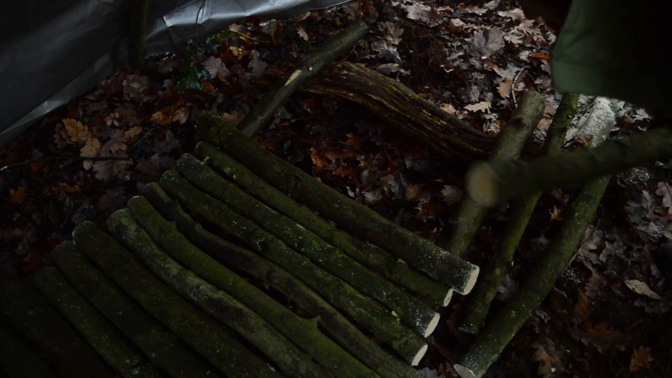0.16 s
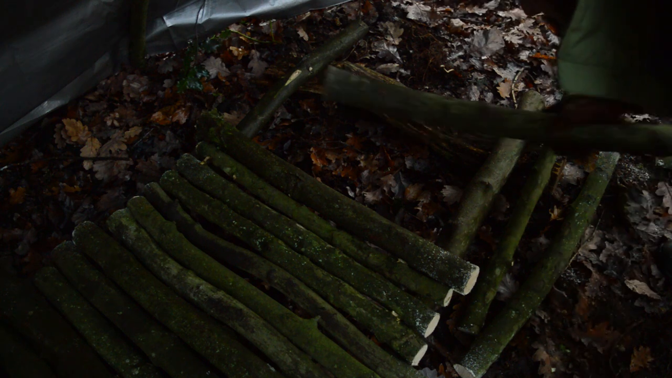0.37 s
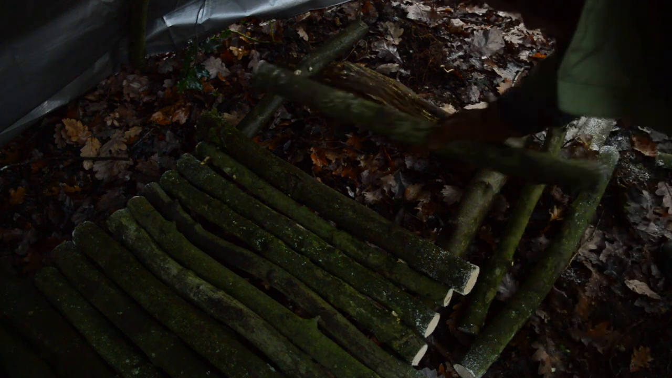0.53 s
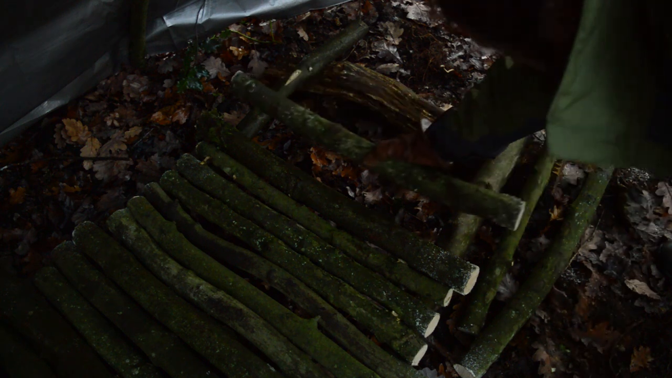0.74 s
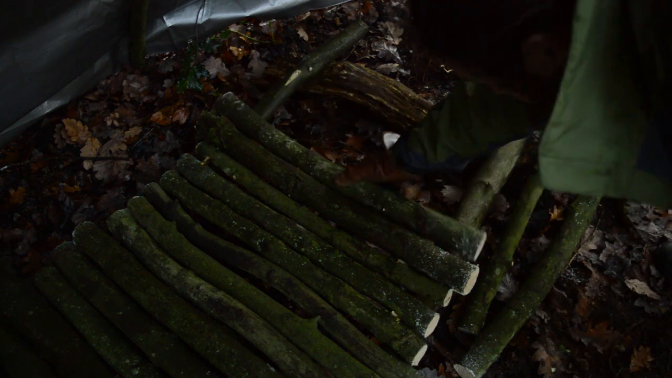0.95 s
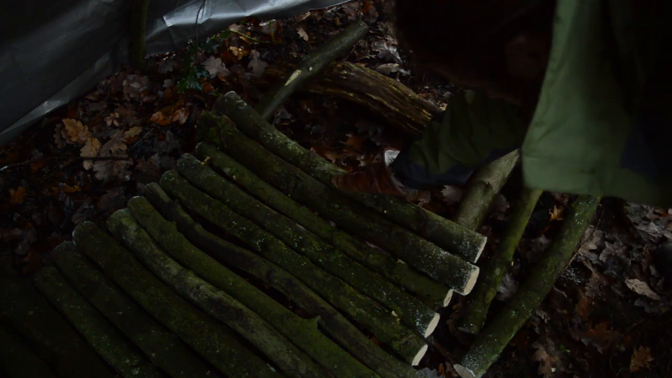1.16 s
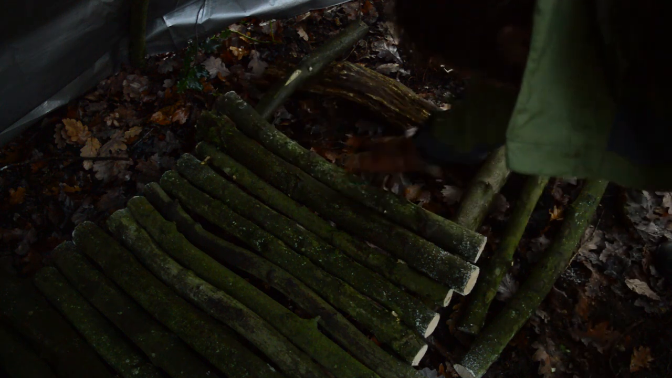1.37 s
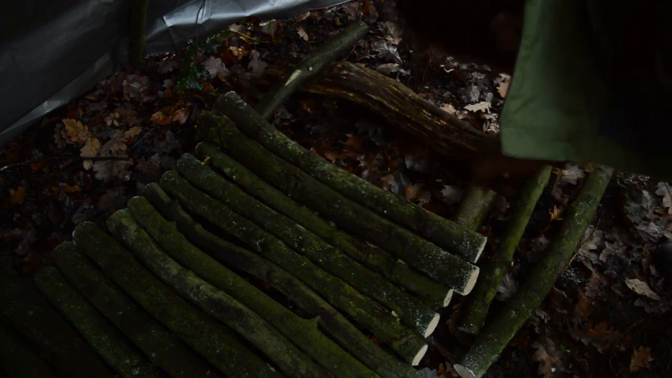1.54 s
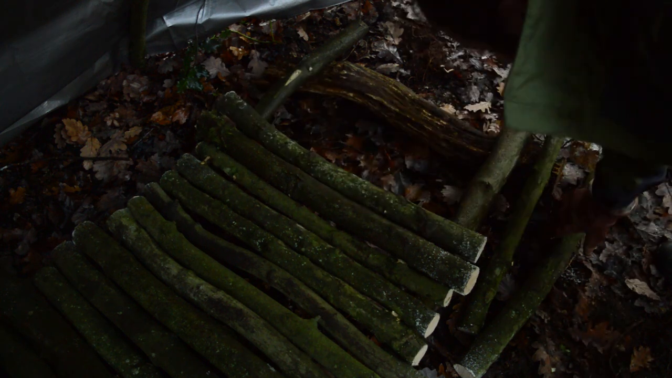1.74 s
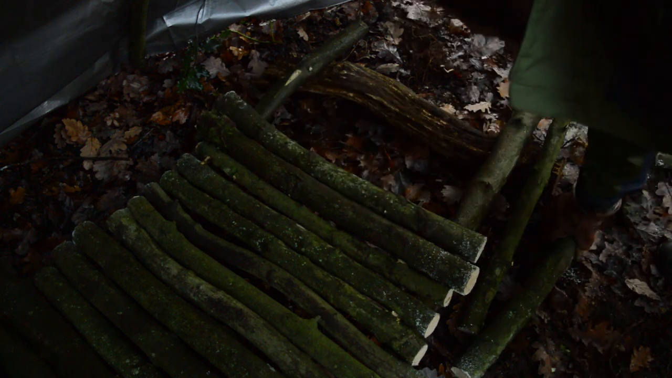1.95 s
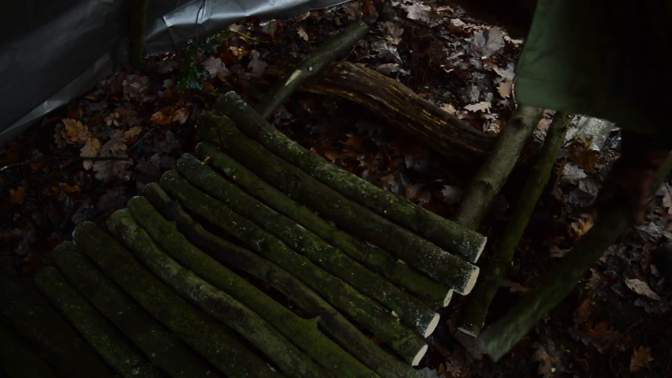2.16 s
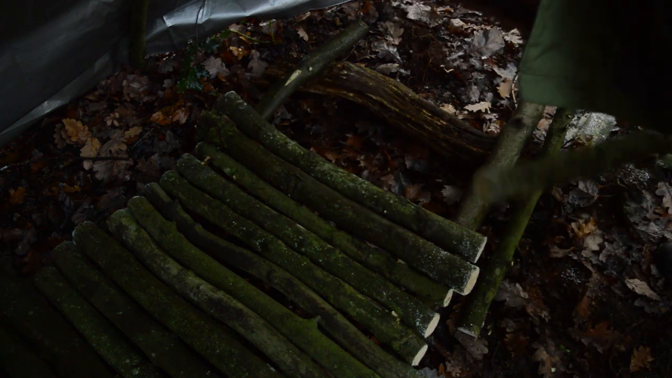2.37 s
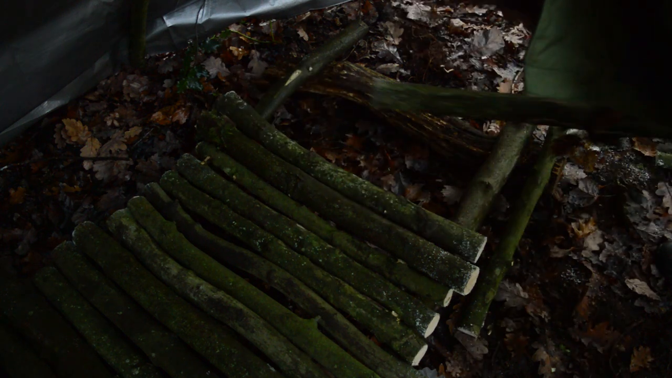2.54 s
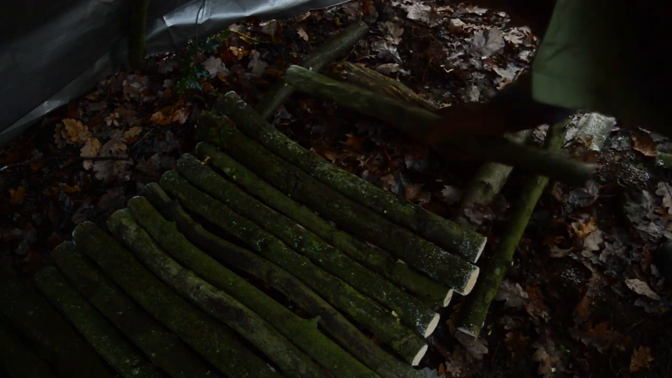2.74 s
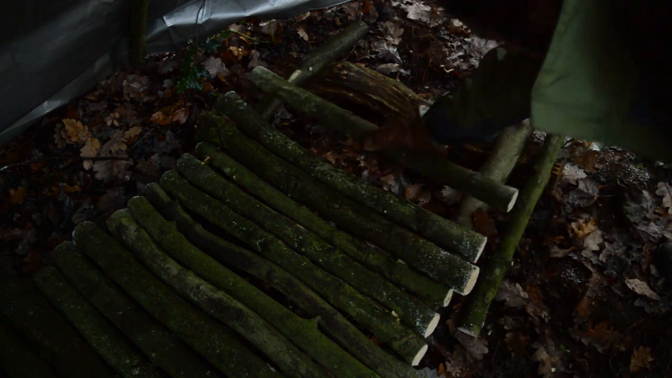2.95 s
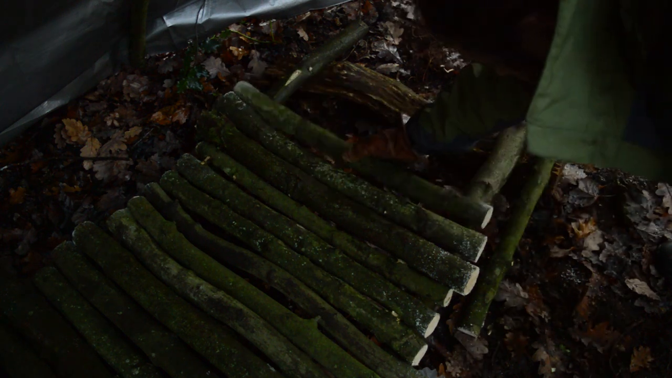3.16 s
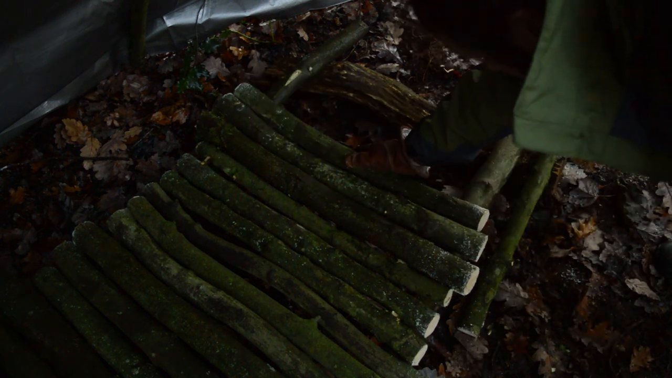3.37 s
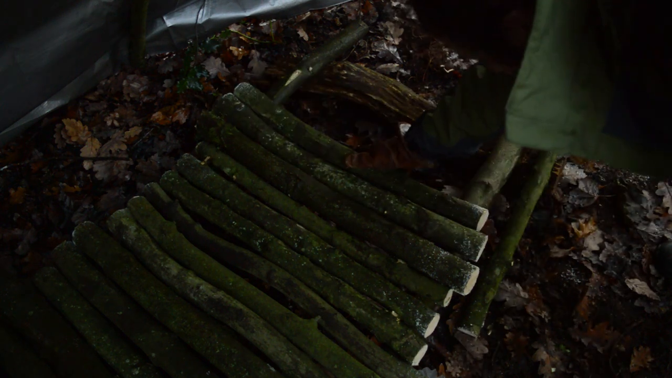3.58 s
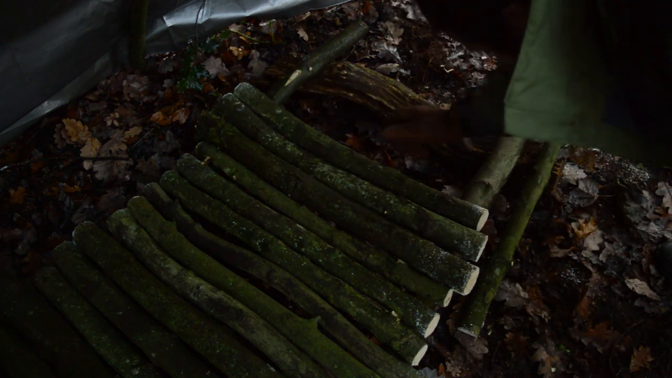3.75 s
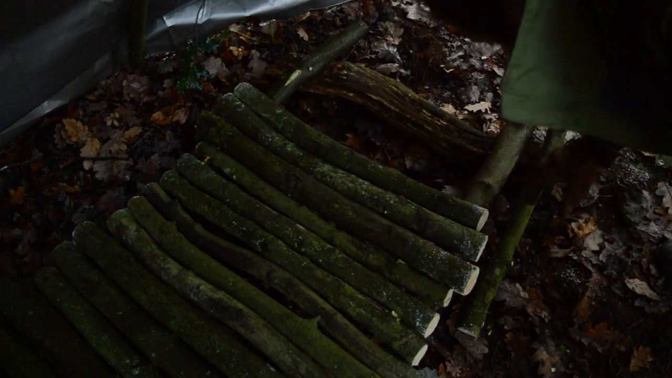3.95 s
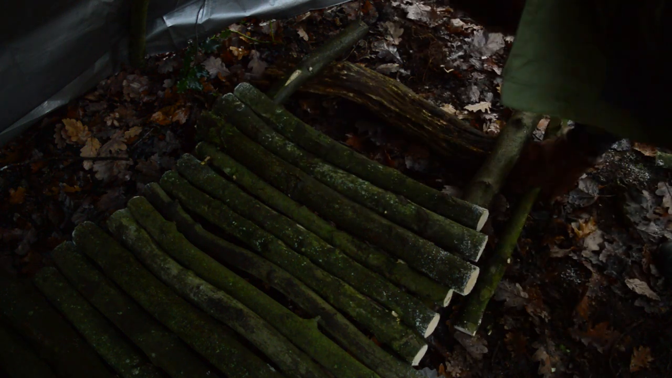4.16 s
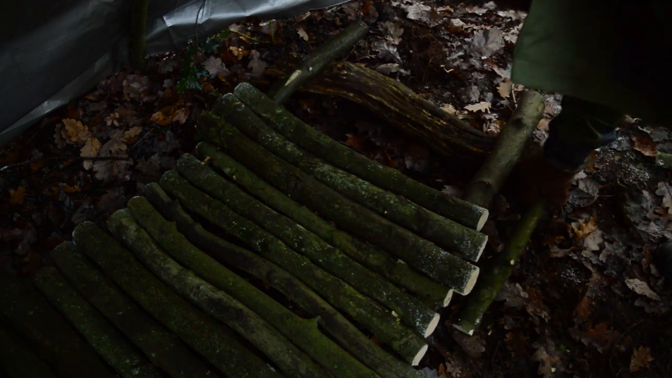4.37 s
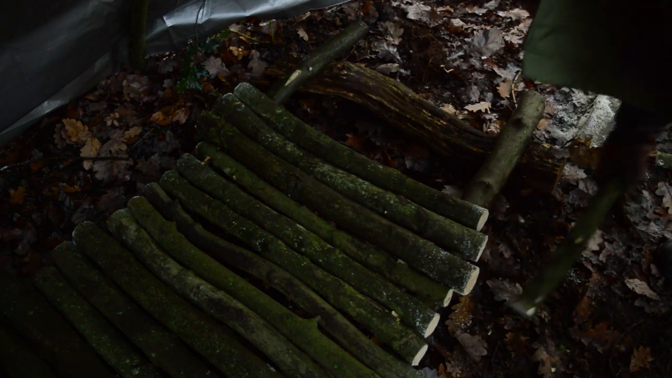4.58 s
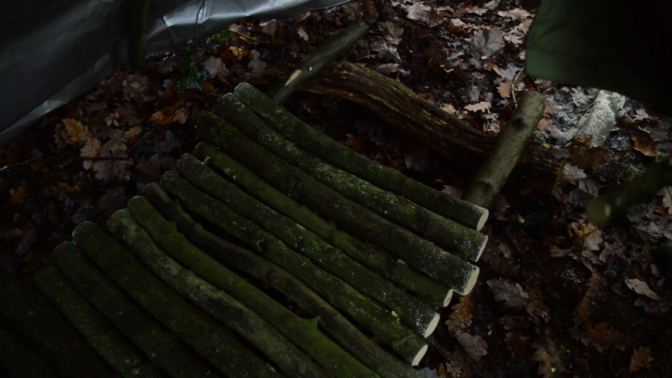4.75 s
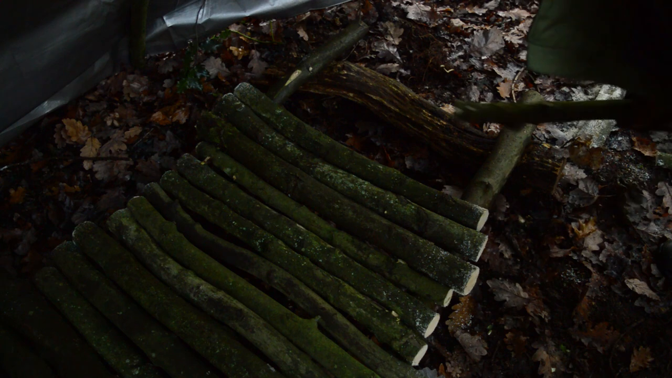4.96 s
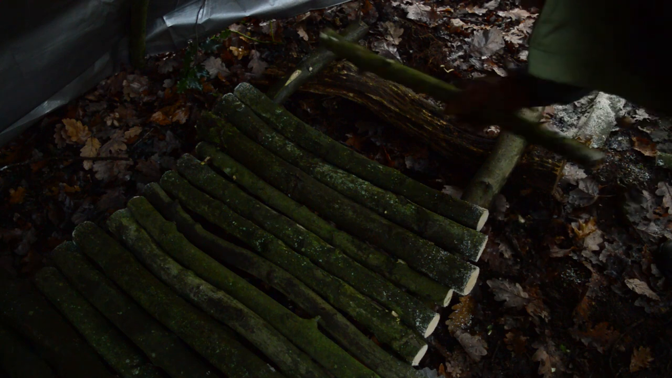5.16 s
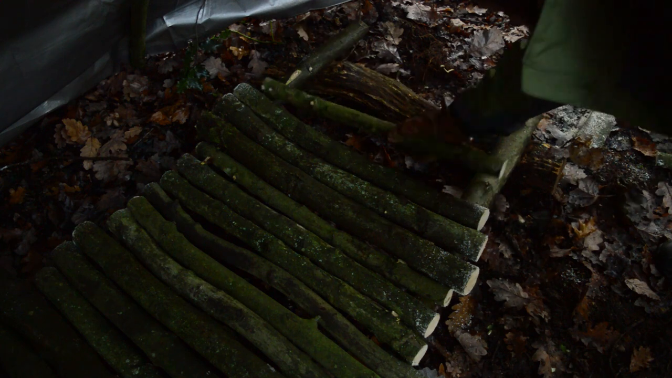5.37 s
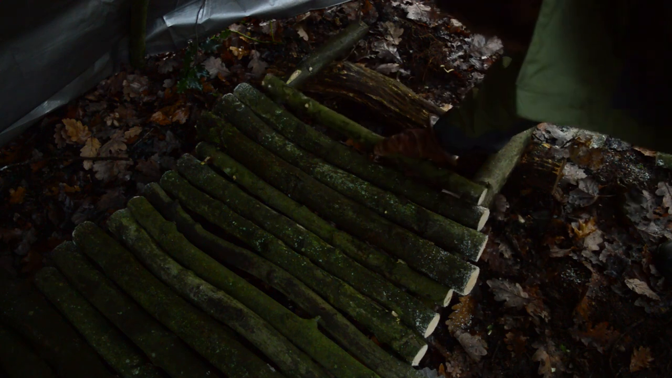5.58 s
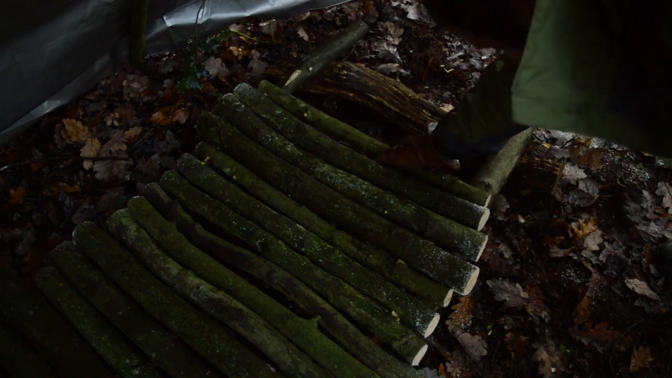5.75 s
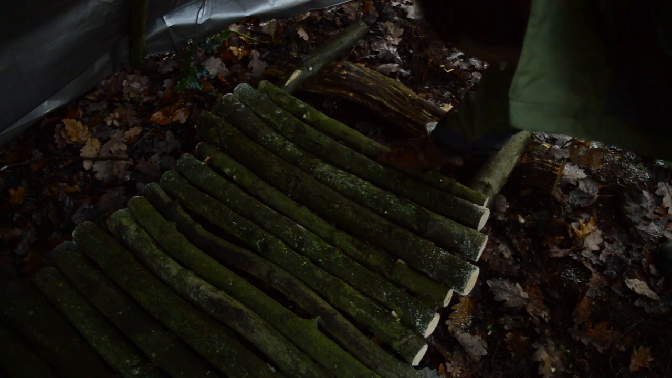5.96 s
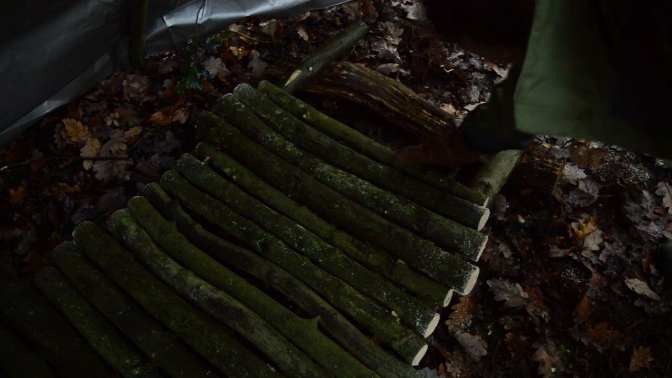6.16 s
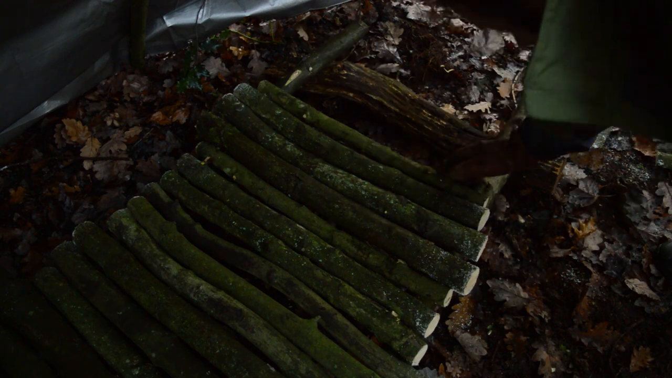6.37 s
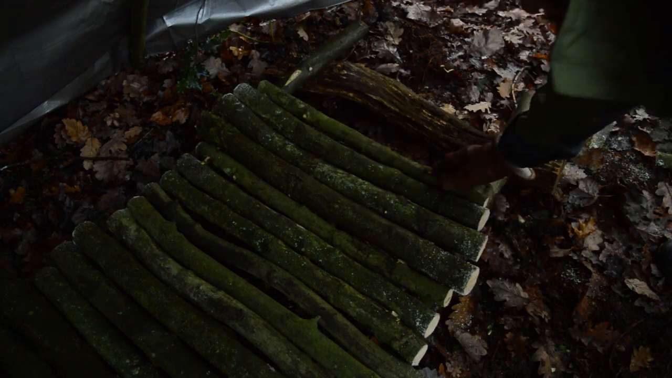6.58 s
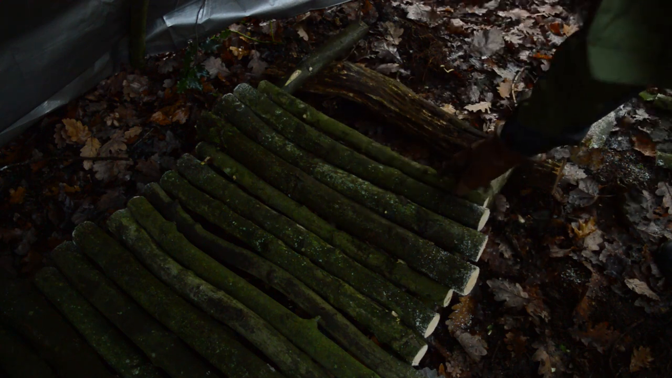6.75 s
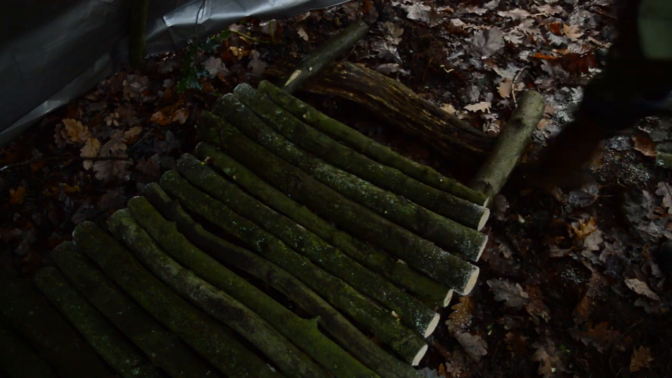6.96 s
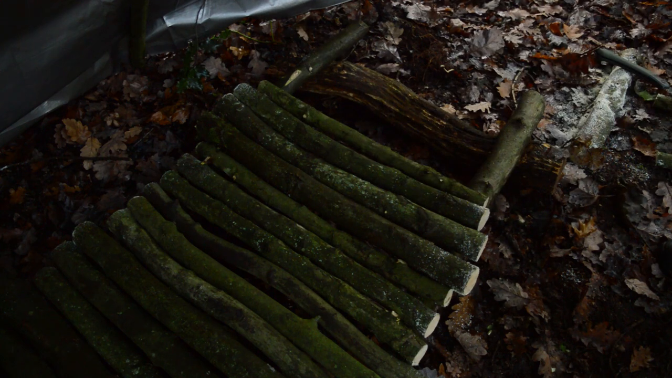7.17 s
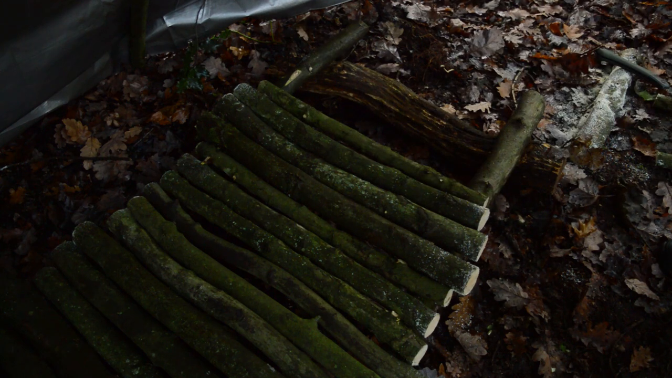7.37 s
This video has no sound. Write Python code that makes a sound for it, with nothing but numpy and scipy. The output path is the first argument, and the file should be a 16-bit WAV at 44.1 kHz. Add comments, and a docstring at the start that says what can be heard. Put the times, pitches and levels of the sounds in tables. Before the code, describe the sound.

Dull, dry wooden knocks at long intervals as poles are set down in woodland, with bark scuffs, twig taps and a soft distant roar.

```python
"""A steady far roar of wind and road, smooth noise with little treble, lies under everything from the start.
Over it three green wooden poles are laid one after another on a log frame in a wood, close to the microphone.
Each pole touches, drops and bounces; every blow adds up dying sine tones, one for each way the pole bends.
Bark scuffs, drags and rustling leaves and sleeves are shaped noise; twig taps are short notes with a puff;
faint chirps are wavering tones. All but rustle and roar get a short, dull echo from trees and ground."""
import sys
import numpy as np
from scipy import signal
from scipy.fft import rfft, irfft, next_fast_len
from scipy.io import wavfile
from scipy.ndimage import uniform_filter1d, map_coordinates

SR = 44100
rng = np.random.default_rng(int(sys.argv[2]) if len(sys.argv) > 2 else 0)


def wav_record(signal):
    """Record a signal, one row per channel, as 16-bit PCM in the file named by sys.argv[1]."""
    frames = np.transpose(np.atleast_2d(signal))
    bounded = np.clip(frames, -1, 1)
    # unit amplitude maps onto the largest positive 16-bit level
    quanta = np.round(bounded * 32767).astype(np.int16)
    wavfile.write(sys.argv[1], SR, quanta)


def invert_db(x):
    """Field ratio 10**(x/20) for x, a level in decibels (scalar or array-like)."""
    u = np.asarray(x, float) / 20
    return 10 ** u


N = 327222  # length in samples

# blows on the poles: t/s, level/dB, first bends over second/dB, third over second/dB,
# higher over second/dB, direction around the pole/degrees
BLOWS = [(1.000, -34, -6, -9, 3, 61), (1.012, -26.5, 11, -4, 2, 55), (1.020, -16, 3.5, -7, -11.5, 29),
         (1.0404, -6.5, -9.5, -11.5, -11.5, 45.5), (1.047, -23.5, 9, 0, -26, 50),
         (3.208, -25, 3.5, -6.5, -7.5, 55), (3.2414, -11, -5.5, -8, -22, 41),
         (3.248, -24.5, 3, -5, -22, 50), (5.337, -18, 3, -7, -26, 62), (5.4209, -36, -24, -14, 6.5, 47),
         (5.4225, -23.5, -2.5, -10, -18, 58), (5.456, -44.5, 11, -5, -9, 29),
         (5.554, -35.5, -1, -11, -22.5, 69), (5.627, -23.5, 2.5, -3, -19, 23),
         (5.684, -43.5, 14, -5, -10, 55), (5.693, -37, -4, -6, -15, 65), (5.8246, -16, -8, -8.5, -26, 57.5)]
# ringing tones of each pole with the frame under it: f/Hz, level/dB, time to die by 60 dB/s
POLE_MODES = [
    [(119, -3, 0.1), (189.5, 0, 0.075), (217, 5, 0.068), (256.5, 0.5, 0.12), (292, -7.5, 0.098),
     (566, 10, 0.033), (648, 2.5, 0.065), (685.5, -6, 0.2), (774, 6.5, 0.024), (980, 1.5, 0.061),
     (1152, -7.5, 0.11), (1370, -12.5, 0.081), (1796, -1, 0.042), (2355, -2.5, 0.03), (2510, -8, 0.044)],
    [(219, 9.5, 0.093), (282, 4.5, 0.11), (304, -11, 0.12), (382, 7.5, 0.038), (453, 2, 0.044),
     (607.5, 0, 0.15), (672, -2.5, 0.18), (901, -2.5, 0.086), (987, 7, 0.048), (1165, -5, 0.17),
     (1227, -2.5, 0.092), (1450, -5, 0.081), (1863, -2, 0.095), (2400, -9, 0.061), (3170, -11, 0.066),
     (3800, -13, 0.056)],
    [(204, 6.5, 0.061), (245.5, -5, 0.17), (394, 0.5, 0.048), (611, -1, 0.1), (834, -3, 0.043),
     (649, -0.5, 0.077), (1020, 1, 0.043), (1210, 3, 0.047), (1133, 5.5, 0.095), (1450, -1, 0.025),
     (1800, -2.5, 0.067), (2430, 10, 0.025), (3840, -1, 0.028), (4600, 1, 0.036)],
]
# moments after which the second and third pole are in hand: t/s
NEXT_POLE_TIMES = [2, 4.5]
# borders between first, second, third and higher bends: f/Hz
BEND_BORDERS = [350, 900, 1500]
# bark and dry leaves cracking: t/s, level/dB, dull part over bright/dB
BARK_CRACKS = [(0.996, -38, 1), (1.0122, -31, 4.5), (1.039, -16.5, 8), (1.058, -26, -25), (1.159, -44, -1),
               (1.975, -49, 2), (2.0717, -49, 7), (2.2416, -41.5, -0.5), (2.7196, -38.5, 2),
               (2.755, -30, -12), (3.007, -40.5, -9), (3.209, -35.5, -2.5), (3.233, -31.5, 1.5),
               (3.244, -17.5, -9.5), (3.368, -38.5, 3.5), (4.576, -42, -1.5), (5.424, -29, 1),
               (5.628, -42, -15), (5.6857, -44.5, 1), (5.826, -36, -4), (6.335, -48, -9), (6.36, -45, -8)]
# single dry leaves snapping: t/s, level/dB, dull part over bright/dB
LEAF_SNAPS = [(1.244, -46, 4), (1.858, -46, 2), (1.909, -46, 7), (2.016, -41.5, 5), (2.204, -43, -1),
              (3.92, -50, 10)]
# a glove or sleeve brushing bark: middle t/s, level/dB, dull part over bright/dB, spread/s
BARK_BRUSHES = [(0.953, -50.5, -3.5, 0.039), (1.025, -37, -19, 0.0065), (1.052, -35, -6, 0.0029),
                (3.399, -50, -4, 0.009), (4.386, -42, 2, 0.0098), (4.531, -45.5, -8, 0.0054),
                (5.333, -41.5, 0.5, 0.014), (5.633, -37.5, -1.5, 0.0033), (6.38, -49, -0.5, 0.03),
                (7.307, -55.5, -17, 0.099)]
# colour of the bright part of a scuff: f/Hz, relative level/dB
BRIGHT_COLOUR = [(3500, -51), (6000, -3.5), (8000, 1), (12000, -2), (16500, -19)]
# colour of the dull part of a scuff: f/Hz, relative level/dB
DULL_COLOUR = [(700, -8.5), (1500, -5), (2600, -7.5), (5500, -4), (8000, -18)]
# twigs and loose sticks tapping: t/s, level/dB (before a common trim), f/Hz
TWIG_TAPS = [(2.787, -32.5, 1520), (2.838, -34.5, 1500), (3.368, -34, 1450), (4.465, -37.5, 1800),
             (4.4827, -28, 1280), (4.53, -39.5, 1700), (5.169, -33, 610), (5.170, -32.5, 1680),
             (7.1904, -32, 1160), (7.277, -35, 1020)]
# a pole dragged over bark in jerks: middle t/s, level/dB, upper resonance over lower/dB
DRAG_JERKS = [(1.571, -47.5, 2), (1.594, -44, -15), (1.612, -40.5, -5), (1.647, -45.5, 0),
              (3.921, -44, 2.5), (3.977, -49.5, 3.5)]
# faint thin chirps near 3 kHz and above, perhaps a far bird or cloth: start t/s, length/s, f/Hz, level/dB
THIN_CHIRPS = [(1.555, 0.07, 4470, -58), (1.57, 0.075, 6550, -57), (1.575, 0.13, 3030, -54),
               (1.632, 0.091, 2740, -50), (1.675, 0.12, 3450, -53), (2.118, 0.16, 3410, -57),]
# leaves and cloth stirring as the body moves: middle t/s, level/dB, spread/s
BODY_STIRS = [(0.577, -64, 0.089), (1.137, -56.5, 0.16), (1.82, -55.5, 0.093), (2.097, -50.5, 0.096),
              (3.095, -60.5, 0.34), (4.492, -59.5, 0.1), (5.51, -58, 0.27), (6.77, -63.5, 0.16),
              (7.352, -56, 0.2)]
# colour of leaves and cloth: f/Hz, relative level/dB
LEAF_COLOUR = [(1200, -30), (2500, -4.5), (4500, -5), (7000, -4.5), (12000, -8.5), (16000, -29)]
# colour of the far wind and road: f/Hz, relative level/dB
ROAR_COLOUR = [(20, -8), (60, 2), (100, -2), (300, -4.5), (1000, -6), (1600, -12), (3000, -19.5),
               (10000, -26), (16000, -32.5)]
# resonance of the microphone port: f/Hz, width/Hz, level over the direct sound/dB
PORT_RESONANCE = (9430, 1300, 3.4)


def unit(x):
    """Scales x to an rms (average strength) of 1."""
    return x / np.sqrt(np.mean(x ** 2) + 1e-20)


def filtered(x, response):
    """Multiplies the spectrum of x by a response that depends on frequency."""
    size = next_fast_len(N + 8192)
    spectrum = rfft(x, size) * response(np.fft.rfftfreq(size, 1 / SR))
    return irfft(spectrum, size)[..., :N]


def coloured(x, colour):
    """Gives x the colour of (f/Hz, level/dB) points joined on a log frequency axis, at rms 1."""
    hz, db = np.transpose(colour)
    return unit(filtered(x, lambda f: invert_db(np.interp(np.log(f + 1), np.log(hz + 1), db))))


def wobble(rate):
    """Draws a smooth random curve through rate random points a second."""
    knots = rng.standard_normal(N // 32)
    return map_coordinates(knots, [np.arange(N) * rate / SR])


def swell(middle, spread):
    """Rises and fades along a bell curve that peaks at 1; both settings are in seconds."""
    now = np.arange(N) / SR
    return np.exp(-((now - middle) / spread) ** 2 / 2)


def add(out, s, sound):
    """Mixes a sound into out at time s."""
    part = out[round(s * SR):][:len(sound)]
    part += sound[:len(part)]


def patchy(x, depth_db):
    """Gives x random patches of gain in time and pitch, as from many separate leaves and fibres."""
    spectrum = signal.stft(x, nperseg=128)[2]
    field = rng.standard_normal(spectrum.shape)
    field = uniform_filter1d(field, size=5, axis=-2)  # smooth over pitch
    field = uniform_filter1d(field, size=6, axis=-1)  # smooth over time
    return signal.istft(spectrum * invert_db(depth_db * unit(field)), nperseg=128)[1][..., :N]


def knocks():
    """Each blow rings the pole in hand; where it lands sets how much each bending order sounds."""
    out = np.zeros(N)
    t = np.arange(SR // 4) / SR
    for s, blow_db, first_db, third_db, higher_db, degrees in BLOWS:
        pole = POLE_MODES[np.searchsorted(NEXT_POLE_TIMES, s)]
        hz, db, t60 = np.transpose(pole)[..., None]
        order_db = np.array([first_db, 0, third_db, higher_db])
        bend_db = blow_db + order_db[np.searchsorted(BEND_BORDERS, hz)]
        # a round pole bends in two planes, whose modes alternate in its table
        turn = np.radians(np.clip(degrees, 2, 88))
        plane = np.sqrt(2) * np.resize([np.cos(turn), np.sin(turn)], hz.shape)
        # each blow finds the pole held a little differently
        scatter_db, detune = rng.standard_normal((2,) + hz.shape)
        hz = hz * (1 + 0.005 * detune)
        decay = invert_db(bend_db + db + scatter_db - 60 * t / t60)
        ring = np.sum(plane * decay * np.sin(2 * np.pi * hz * t), axis=0)
        add(out, s, ring * (1 - np.exp(-t / 0.0013)) ** 2)  # soft bark lets the force build up
    low_hz = 120  # a thin pole radiates little bass
    return filtered(out, lambda f: (-f * f / (low_hz ** 2 - f * f + 1.4j * f * low_hz)) ** 2)


def scuffs():
    """Gritty noise with a bright and a dull part: cracks start sharp and die, brushes swell and fade."""
    level = np.zeros((2, N))  # bright, dull
    t = np.arange(SR // 4) / SR
    bursts = [(*row, 0.026) for row in LEAF_SNAPS]  # the last number is the time to die by 60 dB, in s
    for s, db, dull_db in BARK_CRACKS:
        halvings = 0.0961 * (db + 33.5)  # louder cracks die sooner
        bursts.append((s, db, dull_db, 0.051 * 0.5 ** halvings))
    for s, db, dull_db, t60 in bursts:
        shape = invert_db(db - 60 * t / t60) * (1 - np.exp(-t / 0.00086))
        add(level[0], s, shape)
        add(level[1], s, shape * invert_db(dull_db))
    for s, db, dull_db, spread in BARK_BRUSHES:
        level += invert_db([[db], [db + dull_db]]) * swell(s, spread)
    grit = invert_db(1.4 * wobble(900))
    noise = patchy(rng.standard_normal((2, N)), depth_db=2.5)
    bright = level[0] * coloured(noise[0], BRIGHT_COLOUR)
    dull = level[1] * coloured(noise[1], DULL_COLOUR)
    return grit * (bright + dull)


def taps():
    """Each small stick gives a brief click, a short hollow note and a puff of noise near that note."""
    out = np.zeros(N)
    t = np.arange(SR // 8) / SR
    size = len(t)
    t60 = 0.042  # s
    for s, db, hz in TWIG_TAPS:
        note = np.sin(2 * np.pi * hz * t)
        click = 2.2 * np.sin(2 * np.pi * 1.1 * hz * t) * invert_db(-60 * t / 0.0076)
        hollow = note * np.exp(-1.5 * hz * t)
        puff = signal.fftconvolve(rng.standard_normal(2 * size), hollow)[size:2 * size]
        shape = invert_db(db - 7 - 60 * t / t60) * (1 - np.exp(-t / 0.00024))
        add(out, s, shape * (note + click + 1.37 * unit(puff)))
    return out


def drags():
    """Rough noise in two hollow resonances, swelling at each jerk of the pole over bark."""
    width_hz = 240
    level = np.zeros((2, N))  # lower, upper resonance
    for s, db, upper_db in DRAG_JERKS:
        level += invert_db([[db], [db + upper_db]]) * swell(s, 0.0074)

    def hollow(hz):
        """Noise passed through one resonance, at rms 1."""
        noise = rng.standard_normal(N)
        return unit(filtered(noise, lambda f: f * width_hz / (hz * hz - f * f + 1j * f * width_hz)))

    return level[0] * hollow(577) + level[1] * hollow(1530)


def chirps():
    """Thin tones that waver in pitch and strength."""
    out = np.zeros(N)
    waver = wobble(200)
    flutter = invert_db(1.9 * wobble(110))
    for s, length, hz, db in THIN_CHIRPS:
        size = round(length * SR)
        pitch = hz * (1 + 0.015 * waver[round(s * SR):][:size])
        tone = np.sin(2 * np.pi * np.cumsum(pitch) / SR)
        add(out, s, invert_db(db) * np.sqrt(np.hanning(size)) * tone)
    return out * flutter


def trees(x):
    """Ground, frame and nearby trunks scatter a short, dull answer, made with a dying noise tail."""
    t = np.arange(SR // 3) / SR
    noise = uniform_filter1d(rng.standard_normal(len(t)), size=3)  # averaging dulls it
    tail = noise * invert_db(-60 * t / 0.1) * (t > 0.003)
    return signal.fftconvolve(x, tail / np.linalg.norm(tail))[:N]


def rustle():
    """Leaves and cloth hiss softly, and crackle in clumps of short bursts while they are moved."""
    moving = sum(invert_db(db) * swell(s, spread) for s, db, spread in BODY_STIRS)
    stirring = invert_db(-66) + moving  # a faint rustle stays between movements
    clumps = invert_db(2.5 * wobble(30)) * moving / stirring
    snaps = (rng.random(N) < 300 / SR) * invert_db(2.2 * rng.exponential(size=N).clip(0, 3))  # about 300 a second
    t = np.arange(SR // 20) / SR
    bursts = signal.fftconvolve(snaps, invert_db(-60 * t / 0.014))[:N]  # each snap dies quickly
    crackle = unit(bursts * rng.standard_normal(N))
    hiss = rng.standard_normal(N)
    leaves = coloured(patchy(hiss + 1.14 * clumps * crackle, depth_db=2.5), LEAF_COLOUR)
    return stirring * leaves * invert_db(2.2 * wobble(7.9))


def roar():
    """Far wind and road blend into smooth noise whose level drifts gently."""
    return invert_db(-47) * coloured(rng.standard_normal(N), ROAR_COLOUR) * invert_db(0.7 * wobble(4))


def scene():
    """Contacts and chirps with their scattered echo, over the rustle and the roar."""
    events = knocks() + scuffs() + taps() + drags() + chirps()
    mix = events + invert_db(-16) * trees(events) + rustle() + roar()
    return mix[None]  # one channel


def top_cut(x):
    """Nothing passes above the cut-off."""
    return signal.sosfilt(signal.butter(12, 17000, fs=SR, output="sos"), x)


def record(dry):
    """The microphone port lifts the treble; a low-pass stops at 15.9 kHz; peaks round off at full scale."""
    hz, width, db = PORT_RESONANCE

    def response(f):
        """Direct sound plus the port resonance, then the low-pass."""
        port = 1j * f * width / (hz * hz - f * f + 1j * f * width)
        low_pass = f < 15900
        return low_pass * (1 + invert_db(db) * port)

    heard = filtered(dry, response)
    heard = heard / (1 + np.abs(heard) ** 6) ** (1 / 6)
    return top_cut(heard)


dry = scene()
out = record(dry)
wav_record(out)
```